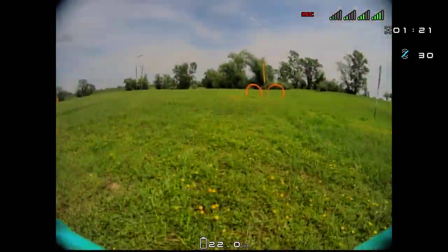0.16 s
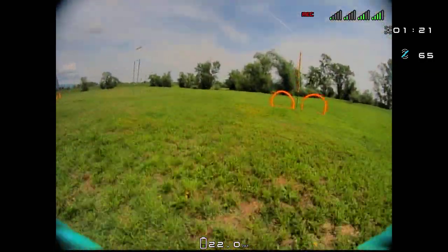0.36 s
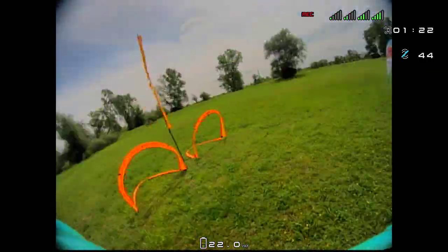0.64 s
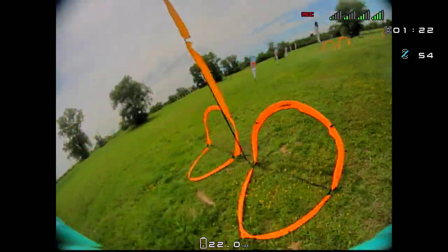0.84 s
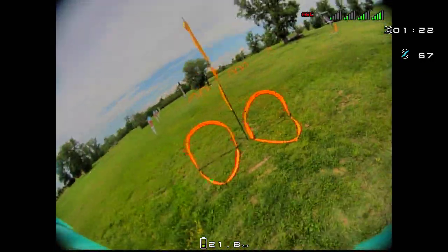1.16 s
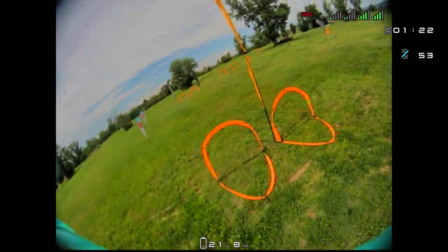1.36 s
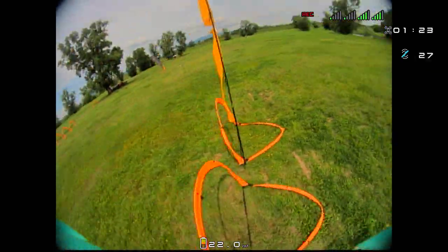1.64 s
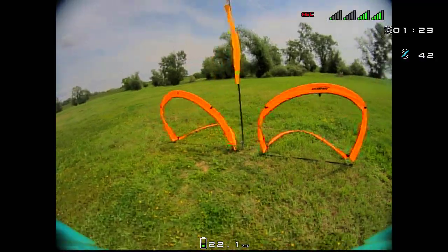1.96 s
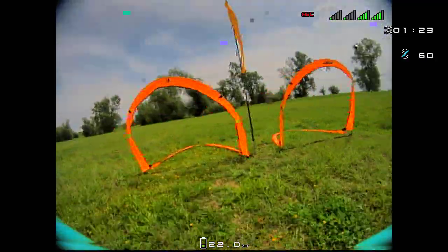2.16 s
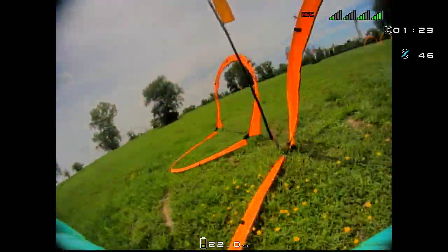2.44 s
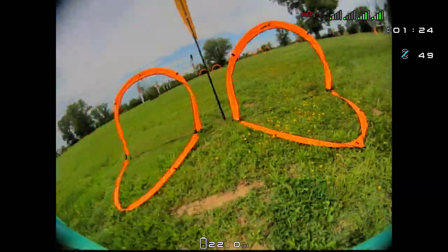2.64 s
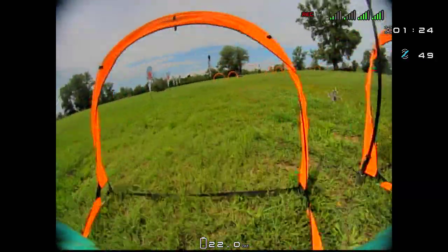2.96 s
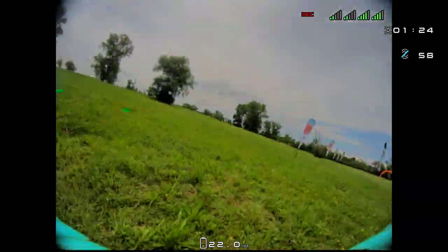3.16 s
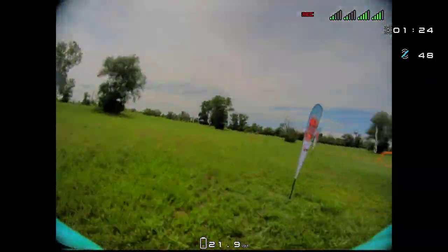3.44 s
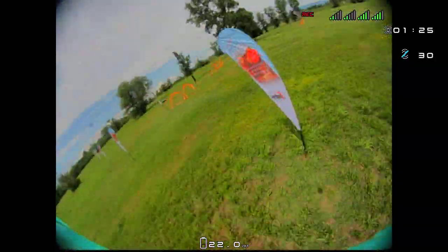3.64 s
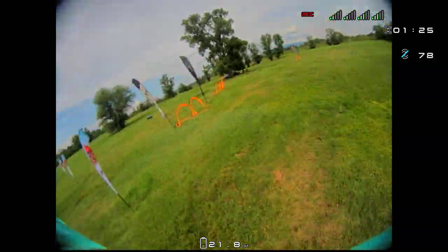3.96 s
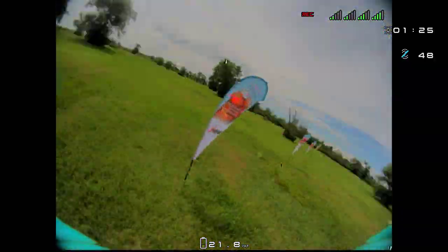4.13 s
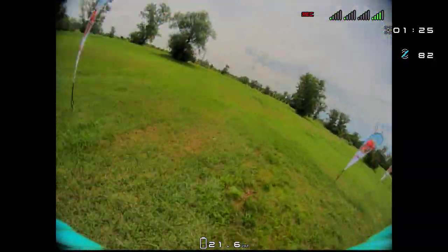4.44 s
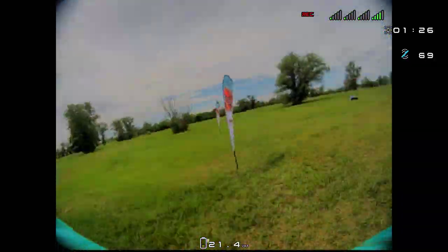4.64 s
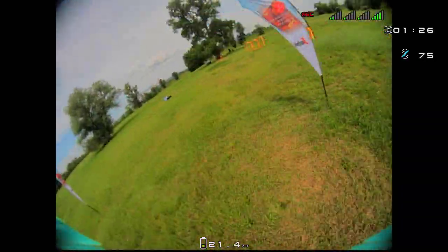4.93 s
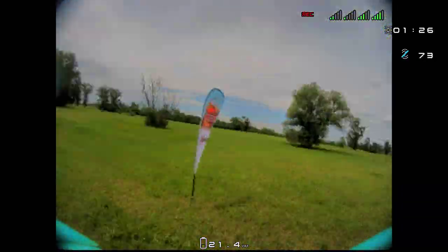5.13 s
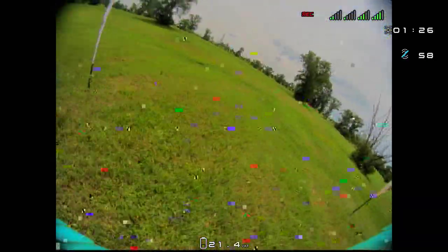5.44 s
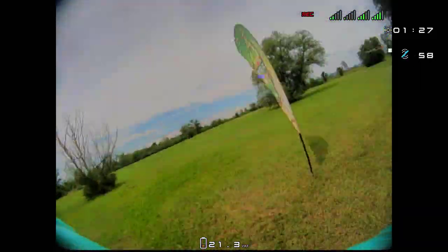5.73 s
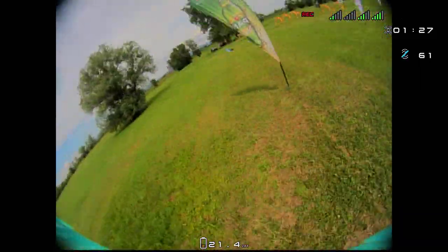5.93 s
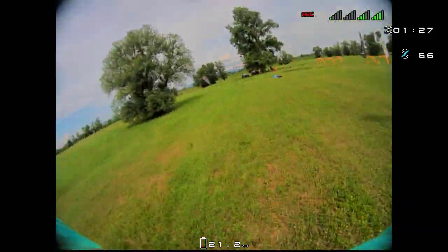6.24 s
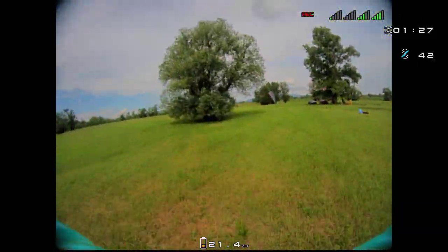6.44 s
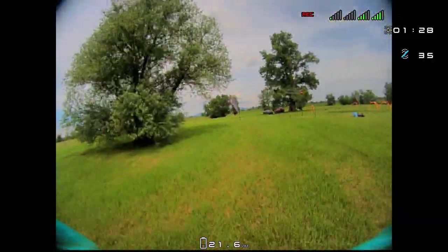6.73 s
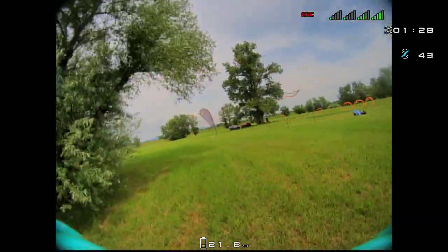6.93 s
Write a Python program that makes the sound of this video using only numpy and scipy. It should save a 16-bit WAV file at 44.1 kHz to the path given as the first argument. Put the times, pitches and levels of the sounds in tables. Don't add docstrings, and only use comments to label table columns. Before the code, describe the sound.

Small racing quadcopters buzz around an open grassy field, heard by one microphone at the edge. Whines rise and fall in quick throttle bursts, busy for the first two seconds, thinner and more distant in the middle, then densely overlapping and loudest from four to five and a half seconds. Another pass comes just after six, then fades. Breathy blade hiss follows each surge, with light wind and faint rumble beneath.

```python
import sys
import numpy as np
from scipy import signal
from scipy.fft import rfft, irfft, next_fast_len
from scipy.io import wavfile
from scipy.ndimage import uniform_filter1d, map_coordinates

SR = 44100
rng = np.random.default_rng(int(sys.argv[2]) if len(sys.argv) > 2 else 0)


def rack_gain(trim_db):
    fader = np.asarray(trim_db, float)
    return 10 ** (fader / 20)


def bounce(signal):
    frames = np.transpose(np.atleast_2d(signal))
    limited = np.clip(frames, -1, 1)
    pcm = np.round(limited * 32767).astype(np.int16)
    wavfile.write(sys.argv[1], SR, pcm)


N = 312669

# top_s, top_blade_pass_hz, rise_s, fall_s, tone_db
STRAINING = [
    (3.99, 1521, 0.14, 0.21, -26),
    (4.13, 1490, 0.32, 0.13, -30.5),
    (5.16, 1529, 0.24, 0.094, -29),
]
CHIPPED = [
    (0, 1143, .1, 0.27, -45),
    (3.45, 1297, 0.21, 0.19, -44.5),
    (4.82, 1528, 0.088, 0.15, -30),
    (6.28, 1448, 0.22, 0.092, -37.5),
    (6.4, 1520, .11, 0.12, -37.5),
    (7.0, 1537, 0.19, .23, -42),
]
BALANCED = [
    (.97, 1077, .17, 0.1, -33),
    (1.24, 1456, 0.31, 0.33, -36.5),
    (3.45, 1196, 0.22, .15, -45.5),
    (4.06, 1424, 0.26, 0.25, -41),
    (4.49, 1570, .14, 0.18, -29),
    (5.14, 1400, 0.27, 0.28, -32),
    (5.35, 1174, .12, 0.094, -42),
    (6.42, 1418, 0.14, 0.13, -32),
    (7.09, 1217, 0.24, .1, -40),
]
FACE_ON = [(.58, 1172, 0.22, 0.26, -41.5), (.6, 1230, .28, 0.27, -37.5), (1.32, 1378, 0.28, 0.17, -27),
           (1.72, 1443, 0.22, 0.13, -34), (4.07, 1230, .2, 0.21, -38), (4.55, 997, 0.23, 0.066, -40.5),
           (4.63, 1298, .22, 0.15, -52), (4.87, 1053, 0.15, 0.21, -41.5), (5.19, 1225, 0.24, 0.083, -34),
           (5.72, 1216, 0.28, 0.2, -42), (4.58, 1481, .2, .22, -30.5), (5.62, 1435, .2, 0.24, -33.5),
           (5.58, 1373, .2, 0.095, -34), (6.24, 1372, .3, .3, -32), (5.36, 1394, 0.094, .09, -41),
           (6.41, 1200, 0.1, .1, -35.5), (7.05, 1330, .2, 0.12, -42.5)]
EDGE_ON = [
    (3.23, 1246, 0.086, .12, -54),
    (3.48, 1275, 0.3, 0.11, -63),
    (5.89, 1552, 0.1, .12, -45),
]
STABS = [
    (1.69, 1490, .14, 0.12, -42.5),
    (1.8, 1297, 0.024, .12, -45.5),
    (3.96, 1435, .1, 0.029, -41.5),
    (4.48, 1561, 0.087, 0.047, -37.5),
    (4.51, 1443, 0.094, .12, -38.5),
    (5.04, 1355, 0.073, 0.038, -36),
    (5.35, 1427, .09, .09, -39),
    (5.54, 1365, .1, .02, -39),
    (3.52, 1205, .04, .1, -50),
    (6.27, 1479, 0.11, 0.024, -42),
]
WHINING = [
    (.6, 1145, 0.16, .14, -61.5),
    (1.2, 1438, .15, .08, -51),
    (2.39, 1231, .3, .17, -48),
    (2.43, 1207, .1, .17, -51),
    (3.43, 1257, 0.11, 0.17, -56.5),
    (5.1, 1420, 0.16, .17, -46),
    (5.16, 1519, 0.16, .1, -41),
]
CLIMBING = [
    (1.1, 1346, 0.24, 0.042, -42),
    (1.62, 1319, 0.16, 0.027, -37),
    (1.6, 1430, .13, 0.034, -41.5),
    (4.42, 1236, .15, 0.033, -38),
    (4.48, 1092, .13, 0.0494, -33),
    (4.98, 1145, .22, 0.024, -41),
    (5.56, 1370, .15, .03, -35.5),
]
CRUISING = [(0, 1270, .1, 0.21, -47), (0, 976, .1, 0.18, -51.5), (1.36, 835, 0.31, 0.14, -44.5),
            (1.7, 845, 0.19, 0.17, -45), (2.03, 1081, 0.16, 0.072, -47), (2.15, 860, 0.39, .05, -48.5),
            (2.33, 685, 0.16, .15, -49.5), (2.58, 978, 0.31, .06, -43), (2.74, 788, .15, 0.027, -44.5),
            (2.82, 1194, 0.043, 0.097, -41.5), (3.3, 1031, .05, 0.37, -48), (6.03, 1188, .15, 0.2, -38),
            (6.7, 987, .1, 0.11, -49.5)]
BANKING = [(.72, 950, 0.022, .11, -53), (1.04, 1094, 0.18, 0.074, -46.5), (1.9, 1047, 0.033, 0.14, -53.5),
           (2.43, 902, 0.2, 0.029, -54), (2.5, 1096, .02, 0.13, -48.5), (2.76, 1069, .2, 0.021, -51),
           (2.78, 1027, .05, 0.32, -50.5), (2.85, 1126, .03, 0.19, -49), (3.08, 972, .3, .05, -53.5),
           (3.72, 1099, 0.072, .15, -51), (5.9, 1190, .07, .3, -50), (6.17, 1334, .125, 0.028, -36.5),
           (6.2, 1303, .11, 0.034, -40.5)]


def unit(x):
    return x / np.sqrt(np.mean(x ** 2) + 1e-20)


def wobble(rate_hz, size=N, order=1):
    knots = rng.standard_normal(int(N * rate_hz / SR) + 4)
    return map_coordinates(knots, [np.arange(size) * rate_hz / SR], order=order)


def noise(points):
    m = next_fast_len(N)
    hz, db = np.transpose(points)
    bins_hz = np.fft.rfftfreq(m, 1 / SR)
    gain = rack_gain(np.interp(np.log(bins_hz + 1), np.log(hz + 1), db))
    return unit(irfft(rfft(rng.standard_normal(m)) * gain, m)[:N])


def patchy(x, depth_db):
    z = signal.stft(x, nperseg=512)[2]
    patches = uniform_filter1d(rng.standard_normal(z.shape), size=5, axis=0)
    patches = uniform_filter1d(patches, size=10, axis=1)
    return signal.istft(z * rack_gain(depth_db * unit(patches)), nperseg=512)[1][:N]


def flank(t, top_s, rise_s, fall_s):
    return (t - top_s) / np.where(t < top_s, rise_s, fall_s)


def arch(punch, kind):
    top_s, top_hz, rise_s, fall_s, top_db = punch
    start_s = max(top_s - kind["early"] * rise_s, 0)
    s = np.linspace(start_s, min(top_s + fall_s, N / SR), num=25)
    u = flank(s, top_s, rise_s, fall_s)
    straightening = 0.4
    slack = u ** 2 * (1 + straightening) / (1 + straightening * u ** 2)
    tone_db = top_db - np.where(u < 0, kind["rise_db"], kind["fall_db"]) * slack
    octave_db = tone_db + kind["octave_db"] - kind["load_db"] * u
    return s, top_hz * (1 - kind["sag"] * slack), tone_db, octave_db


def rotor(course, third_db, shake_db):
    # blade_pass_multiple, level_db, smear_rate_hz
    overtones = [(4, 1.5, 90), (5, -0.5, 110), (6, -4.5, 100), (7, -10.5, 250)]
    # shaft_turn_multiple, level_over_shaking_db
    shaft_orders = [(1, -0.1), (2, 5), (4, 0.5), (7, -11)]
    flutters = (3, 4, 5)
    blades, jitter, partner_detune, streak_patch_db = 3, 0.008, 0.025, 2.5
    s, hz, tone_db, octave_db = course
    span = slice(round(s[0] * SR), min(round(s[-1] * SR), N))
    t = np.arange(N)[span] / SR
    n = len(t)

    def inertia(v, size=500):
        return uniform_filter1d(np.interp(t, s, v), size=size, mode="nearest")

    def line(phase, db, flutter_db):
        return rack_gain(db + flutter_db * wobble(70.84, size=n)) * np.sin(phase)

    since_s, left_s = t - s[0] + (s[0] == 0), s[-1] - t + (s[-1] > 7)
    fade = np.clip(np.minimum(since_s, left_s) / 0.02, 0, 1)
    unsteady = 1 + 0.00705 * wobble(39.6, size=n, order=3) + jitter * wobble(160.4, size=n)
    turn = 2 * np.pi * (np.cumsum(inertia(hz, size=1500) * unsteady) / SR + rng.random())
    partner = turn + np.cumsum(partner_detune * wobble(7, size=n, order=3) * np.gradient(turn))
    tone, octave = inertia(tone_db), inertia(octave_db)
    middle = (tone + octave) / 2
    sound = np.zeros(n)
    for k, db in enumerate((tone, octave, middle + third_db), start=1):
        sound += line(k * turn, db, flutters[k - 1])
        sound += rack_gain(db - 13 + 6.0 * wobble(14.8, size=n)) * np.sin(k * partner)
    for k, db in shaft_orders:
        sound += line(k / blades * turn, tone + shake_db + db, flutter_db=0.0)
    streaks = np.zeros(n)
    for k, db, smear_hz in overtones:
        smear = 1.09 + 0.38 * wobble(smear_hz, size=n)
        streaks += smear * rack_gain(db + streak_patch_db * wobble(14.0, size=n)) * np.sin(k * turn)
    weight = fade * rack_gain(0.5 * middle) * (inertia(hz) / 1300) ** 5
    return span, np.sqrt(2) * fade * sound, weight * np.array([np.cos(turn), streaks, np.ones(n)])


def wash():
    # top_s, rise_s, fall_s, tip_hiss_db, low_wash_db
    surges = [(0, .1, 0.24, -35, -38), (.58, 0.1, .25, -40.5, -43), (.95, 0.14, 0.12, -31.5, -27.5),
              (1.15, 0.095, 0.39, -31, -37), (1.34, 0.26, 0.2, -27.5, -27.5),
              (1.71, 0.31, .27, -33.5, -31.5), (2.2, 0.88, 0.82, -40, -37), (2.5, 0.2, 0.18, -33.5, -54),
              (2.86, 0.25, 0.22, -34, -34), (3.2, 0.88, 0.48, -39.5, -47), (3.55, 0.33, 0.72, -34, -34.5),
              (3.92, 0.069, 0.077, -44, -23.5), (4.05, 0.24, 0.26, -28, -34), (4.5, 0.21, 0.18, -24, -26),
              (4.8, 0.15, 0.16, -33.5, -28.5), (5.09, 0.25, 0.3, -25.5, -28.5),
              (5.36, 0.092, 0.096, -30, -29.5), (5.53, 0.23, 0.18, -33, -27), (5.91, 0.17, 0.2, -34, -35.5),
              (6.1, 0.1, 0.25, -34.5, -43), (6.33, 0.42, 0.23, -31.5, -27.5), (7.02, 0.14, .2, -33, -32)]
    far_hiss_db, far_low_db = -48, -43.5
    drop_db, rounding = 16.5, 1.6
    t = np.arange(0, N + 64, 64) / SR
    power = rack_gain([[2 * far_hiss_db], [2 * far_low_db]])
    for top_s, rise_s, fall_s, hiss_db, low_db in surges:
        loss_db = drop_db * abs(flank(t, top_s, rise_s, fall_s)) ** rounding
        power = power + rack_gain(2 * (np.array([[hiss_db], [low_db]]) - loss_db))
    return [np.interp(np.arange(N) / SR, t, 10 * np.log10(p)) for p in power]


def drones():
    kinds = [
        dict(punches=STRAINING, sag=.3, early=1.6, rise_db=18, fall_db=27.5, octave_db=-7, load_db=10, third_db=-4, shake_db=-16.5, say_db=-5, streak_db=-10),
        dict(punches=CHIPPED, sag=.3, early=1.5, rise_db=15.5, fall_db=25, octave_db=-4.5, load_db=8.5, third_db=-5.5, shake_db=-22, say_db=-4, streak_db=1.5),
        dict(punches=BALANCED, sag=.3, early=1.1, rise_db=13.5, fall_db=24.5, octave_db=-4.5, load_db=2.5, third_db=-8.5, shake_db=-30, say_db=2.5, streak_db=-8.5),
        dict(punches=FACE_ON, sag=.3, early=1.25, rise_db=17.5, fall_db=25, octave_db=-13, load_db=-10, third_db=-12.5, shake_db=-24, say_db=-14, streak_db=-5),
        dict(punches=EDGE_ON, sag=.3, early=1.1, rise_db=2, fall_db=14, octave_db=7.5, load_db=-1, third_db=-9, shake_db=-10, say_db=-4, streak_db=2.5),
        dict(punches=STABS, sag=.2, early=1.01, rise_db=6, fall_db=8.5, octave_db=7.5, load_db=1.3, third_db=-4, shake_db=-16.5, say_db=-8, streak_db=0),
        dict(punches=WHINING, sag=.2, early=1.02, rise_db=6, fall_db=2, octave_db=3, load_db=1, third_db=4.5, shake_db=-11.5, say_db=-0.5, streak_db=0),
        dict(punches=CLIMBING, sag=.29, early=1.02, rise_db=3.5, fall_db=12, octave_db=-18, load_db=6, third_db=-7, shake_db=-29, say_db=-5, streak_db=-3),
        dict(punches=CRUISING, sag=.1, early=1.01, rise_db=5, fall_db=8.5, octave_db=-5, load_db=0.1, third_db=-5, shake_db=-24, say_db=0, streak_db=1),
        dict(punches=BANKING, sag=.11, early=1.01, rise_db=-3.5, fall_db=4, octave_db=8, load_db=0.5, third_db=-6.5, shake_db=-21, say_db=-9.5, streak_db=6),
    ]
    # freq_hz, density_db_per_hz
    hiss_colour = [(1500, -14), (2500, -5.5), (4000, 1), (6000, 1), (8700, 1.5), (10500, -7),
                   (13000, -16.5), (15700, -48)]
    # freq_hz, density_db_per_hz
    low_colour = [(250, -15.5), (500, -18.5), (750, -3.5), (1000, 2), (1500, 0.5), (2200, -0.5),
                  (3500, -3.5), (6000, -23)]
    hiss_db, low_db = wash()
    streak_db = -8 - 0.076 * (hiss_db + 34)
    tones, say = np.zeros(N), np.zeros((3, N))
    for kind in kinds:
        say_db = kind["say_db"] + np.array([[0], [kind["streak_db"]], [0]])
        for punch in kind["punches"]:
            span, sound, part = rotor(arch(punch, kind), kind["third_db"], kind["shake_db"])
            tones[span] += sound
            say[:, span] += rack_gain(say_db) * part
    puffs, streaks = say[:2] / (say[2] + rack_gain(-33.5))
    eddies = rack_gain(1.1 * wobble(14) + 0.68 * wobble(90))
    tip_noise = np.exp(0.26 * puffs) * eddies * patchy(noise(hiss_colour), depth_db=2.5)
    hiss = rack_gain(hiss_db + 0.26) * unit(tip_noise)
    low = rack_gain(low_db - 5.06) * unit(eddies * noise(low_colour))
    return tones + hiss + low + rack_gain(hiss_db + streak_db + 4.0) * streaks


def field():
    # freq_hz, density_db_per_hz
    air_colour = [(10, -8.5), (25, 1), (50, -7), (90, 0.5), (130, -8.5), (300, -15.5), (700, -19),
                  (2000, -23.5), (8000, -29), (15700, -45)]
    # top_s, level_over_breeze_db
    gusts = [
        (.1, 8),
        (1.42, 8),
        (2.66, 13),
        (3.679, 9),
        (6.36, 18.5),
    ]
    # freq_hz, width_hz, level_db
    hum_bands = [(57.4, 11.5, -57), (79.2, 8.4, -53.5), (178.5, 2.3, -57.5), (248.5, 3.5, -65),
                 (446.4, 8.4, -69.5), (537, 8.5, -66)]
    t = np.arange(N) / SR
    air = rack_gain(-47.5) * noise(air_colour)
    gusts_db = sum(db * np.exp(-((t - top_s) / 0.058) ** 2) for top_s, db in gusts)
    buffet_db = -50.5 + gusts_db + 1.1 * wobble(4.5, order=3)
    buffet = rack_gain(buffet_db) * noise([(8, -6), (30, -21), (60, -5), (120, -50)])
    hum = np.zeros(N)
    for hz, w, db in hum_bands:
        hum += rack_gain(db) * noise([(hz - 3 * w, -60), (hz - w / 2, 0), (hz + w / 2, 0), (hz + 3 * w, -60)])
    return air + buffet + hum


def scene():
    return np.tile(drones() + field(), (2, 1))


def electronics():
    # freq_hz, level_db
    whistles = [(13954, -65), (14040, -79)]
    t = np.arange(N) / SR
    whistle = np.zeros(N)
    for hz, db in whistles:
        whistle += rack_gain(db + 4.5) * np.sin(2 * np.pi * hz * t + 1.4 * wobble(30))
    return whistle - 0.0136


def top_cut(x):
    return signal.sosfilt(signal.butter(12, 15790, fs=SR, output="sos"), x)


def record(dry):
    mix = dry + electronics()
    return top_cut(mix)


dry = scene()
out = record(dry)
bounce(out)
```